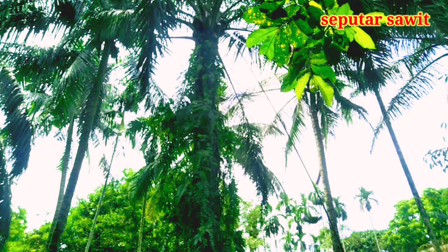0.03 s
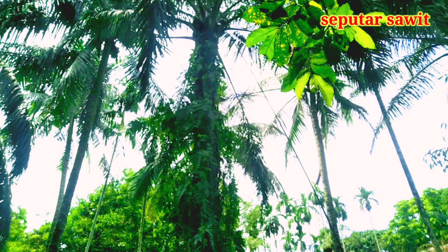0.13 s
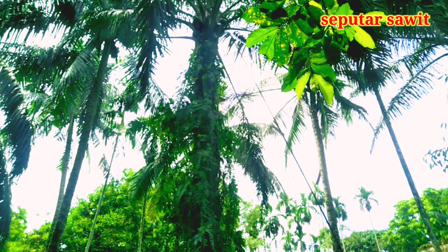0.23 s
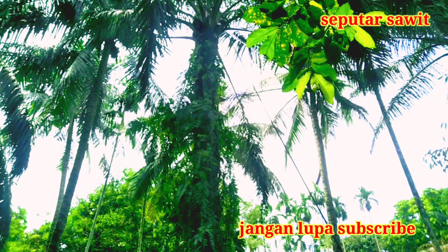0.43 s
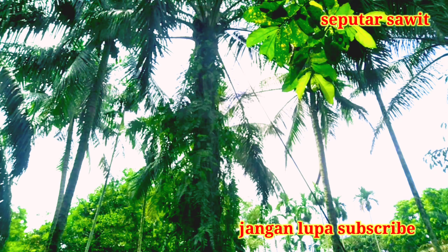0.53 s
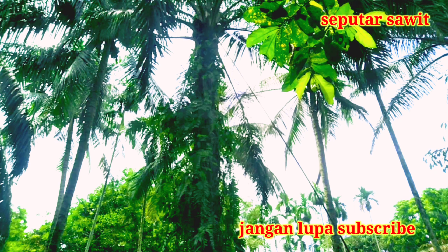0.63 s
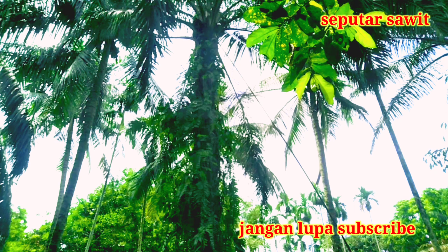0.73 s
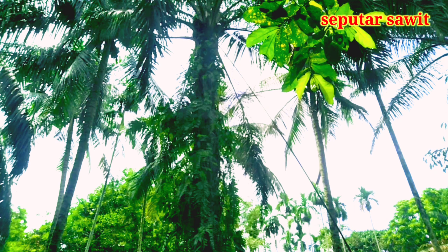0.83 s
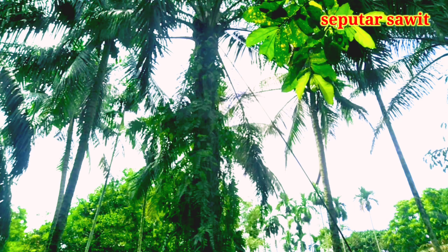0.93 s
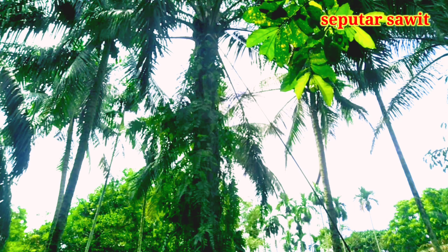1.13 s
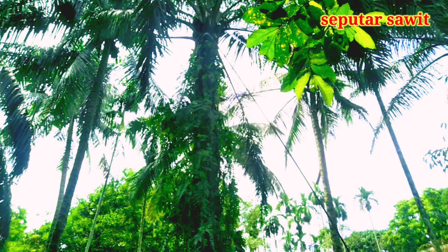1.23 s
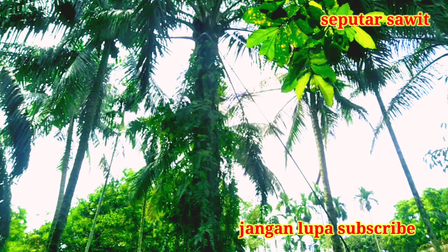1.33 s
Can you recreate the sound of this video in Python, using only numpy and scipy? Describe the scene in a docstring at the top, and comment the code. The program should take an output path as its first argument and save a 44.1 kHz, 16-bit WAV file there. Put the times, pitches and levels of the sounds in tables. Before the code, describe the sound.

A heavy thud on soil and dry leaves, then weaker knocks and crackling twigs.

```python
"""Heavy fall in a plantation

A heavy object, probably a cut palm fruit bunch, lands on soil and dry fronds, rebounds and settles.
Each impact excites damped modes of the soil, the bunch or a woody stalk; leaves and twigs break in
swarms of tiny fractures. The trunks scatter the impacts back as reverberation.
A far slow engine throbs under faint hiss, insect-like chirrs and a few thin whistles."""
import sys
import numpy as np
from scipy import signal
from scipy.fft import rfft, irfft
from scipy.io import wavfile
from scipy.ndimage import uniform_filter1d

SR = 44100
rng = np.random.default_rng(int(sys.argv[2]) if len(sys.argv) > 2 else 0)


def master(y):
    """Save y as 16-bit WAV."""
    cut = np.clip(np.atleast_2d(y).T, -1, 1)
    pcm = np.round(cut * 32767)  # scale
    wavfile.write(sys.argv[1], SR, pcm.astype(np.int16))


N = 61739


def undb(db):
    """Amplitude ratio of a level in decibels."""
    return 10 ** (np.asarray(db) / 20)


def panned(db, pan_db):
    """Level difference: left and right gains, pan_db apart."""
    return undb(db + np.array([[pan_db], [-pan_db]]) / 2)


def unit(x):
    """Normalisation to rms 1."""
    return x / np.sqrt(np.mean(x ** 2) + 1e-20)


def since(start):
    """Elapsed seconds, zero before the start."""
    return np.maximum(np.arange(N) / SR - start, 0)


def decay(t, t60):
    """Exponential damping: 60 dB in t60 seconds."""
    return np.exp(-np.log(1000) * t / t60)


def arch(start, length):
    """Half-sine envelope."""
    return np.sin(np.pi * np.minimum(since(start) / length, 1))


def freqs():
    """Bin frequencies of the spectrum, at least 1 Hz."""
    return np.maximum(np.fft.rfftfreq(N, 1 / SR), 1)


def colour(x, points, tilt_db=0):
    """Spectral shaping by a curve, tilted per octave about 2 kHz and rolled off below its first point."""
    hz, db = np.array(points).T
    octave = np.log2(freqs())
    curve = np.interp(octave, np.log2(hz), db) + tilt_db * (octave - np.log2(2000))
    return irfft(rfft(x) * undb(curve) * np.minimum(freqs() / hz[0], 1) ** 2, N)


def band(x, hz, width):
    """Band-pass filtering, normalised to rms 1."""
    return unit(irfft(rfft(x) / (1 + (2 * (freqs() - hz) / width) ** 2), N))


def diffuse(pair, coherent_below_hz=370):
    """Diffuse field: the two channels are coherent only at long wavelengths."""
    mid, side = rfft(pair)
    apart = 1 / np.hypot(1, coherent_below_hz / freqs()) ** 2
    return irfft((mid + apart * side * np.array([[1], [-1]])) / np.hypot(1, apart), N)


def fractures(per_s, spread_db=2):
    """Brittle fracture as a Poisson process: random clicks, mostly weak and a few strong."""
    clicks = (rng.random((2, N)) < per_s / SR) * rng.choice([-1, 1], (2, N))
    strength = undb(spread_db * np.minimum(rng.exponential(size=(2, N)), 5))
    return diffuse(clicks * strength)


def strike(blows, modes, contact_s, detune, lag_s):
    """Modal superposition: each blow rings slightly detuned modes, lag_s later on the right."""
    out = np.zeros((2, N))
    for start, db, pitch in blows:
        t = np.array([since(start), since(start + lag_s)])
        onset = 1 - np.exp(-t / contact_s)
        for hz, mode_db, t60, pan_db in modes:
            tuned_hz = hz * pitch * (1 + detune * rng.standard_normal())
            out += panned(db + mode_db, pan_db) * np.sin(2 * np.pi * tuned_hz * t) * decay(t, t60) * onset
    return out


# Spectrum of the outdoor hiss (frequency [Hz], relative spectral level [dB])
HISS_SPECTRUM = [(30, 4), (60, -12), (110, 0.5), (140, 0), (175, -0.5), (230, -11.5), (420, -31.5),
                 (900, -25), (1900, -34), (2400, -22.5), (3900, -20.5), (6400, -31), (9300, -28),
                 (12000, -34), (15000, -43)]
def hiss(level_db=-57.5):
    """Ambient noise: a steady diffuse field."""
    return undb(level_db) * unit(colour(diffuse(rng.standard_normal((2, N))), HISS_SPECTRUM))


# Distant chirrs (time [s], duration [s], level [dB], frequency [Hz])
INSECT_CHIRRS = [(0.159, 0.11, -57.5, 4510), (1.103, 0.092, -56, 4560), (1.131, 0.058, -59, 3800),
                 (1.151, 0.11, -62, 4430), (1.385, 0.057, -57.5, 4670)]
def chirrs(width_hz=440):
    """Narrow-band noise, probably from insects, swells and fades."""
    return sum(undb(db) * band(rng.standard_normal((2, N)), hz, width_hz) * arch(start, length)
               for start, length, db, hz in INSECT_CHIRRS)


# Thin tones (time [s], duration [s], level [dB], frequency [Hz], left minus right [dB])
WHISTLE_NOTES = [(.86, 0.084, -66.5, 1443, 16), (.97, 0.08, -66.5, 1447, 13), (0.968, 0.077, -67, 1075, 7),
                 (.995, 0.04, -64.5, 1780, -8), (1.03, 0.1, -69.5, 2500, 0)]
def whistles(waver_depth=0.0029):
    """Random frequency modulation: faint tones, perhaps distant birds, waver in pitch."""
    out = np.zeros((2, N))
    for start, length, db, hz, pan_db in WHISTLE_NOTES:
        waver = unit(uniform_filter1d(rng.standard_normal(N), size=700))
        tone = np.sin(2 * np.pi * np.cumsum(hz * (1 + waver_depth * waver)) / SR)
        out += panned(db, pan_db) * tone * arch(start, length)
    return out


# Strength of the throb (time [s], level [dB])
THROB_LEVELS = [(0, -41), (.2, -43.5), (.48, -43), (.58, -58), (.72, -48.5), (1.0, -49), (1.2, -49),
                (1.35, -42.5)]
# Partials of an exhaust puff (frequency [Hz], relative level [dB])
EXHAUST_PARTIALS = [(134, -2.5), (170, -11), (240, -14)]
def engine(period_s=0.04998, rise_s=0.01411, jitter_s=0.00042, scatter_db=1.5):
    """Quasi-periodic pulse train: each firing arrives as a low puff, rounded by distance."""
    out = np.zeros(N)
    for start in np.arange(0.0045, N / SR, period_s):
        size, late, pitch = rng.standard_normal(3)
        t = since(start + jitter_s * late)
        swell = (t / rise_s * np.exp(1 - t / rise_s)) ** 3
        level_db = np.interp(start, *np.array(THROB_LEVELS).T) + scatter_db * size
        for hz, db in EXHAUST_PARTIALS:
            partial = np.cos(2 * np.pi * hz * (1 + 0.03 * pitch) * (t - rise_s))
            out += undb(level_db + db) * swell * partial
    return out


# Colour of the scattered sound (frequency [Hz], relative gain [dB])
ECHO_SPECTRUM = [(60, -33), (150, -11.5), (240, -7), (400, -11.5), (620, -9), (1000, -6), (1500, -5),
                 (3000, -7), (8000, 1), (15000, -18)]
def grove_echo(x, gain_db=-7, gap_s=0.014, build_s=0.0049, t60_s=0.96):
    """Multiple scattering: after a travel delay, trunks and crowns return a thin reverberation."""
    t = since(gap_s)
    envelope = (1 - np.exp(-t / build_s)) * decay(t, t60_s)
    scatter = colour(diffuse(rng.standard_normal((2, N))), ECHO_SPECTRUM)
    response = scatter * envelope / np.sqrt(np.sum(envelope ** 2))
    return undb(gain_db) * signal.fftconvolve(x, response, axes=1)[:, :N]


# Crinkles of single leaves (time [s], duration [s], level [dB])
LEAF_CRINKLES = [(0.028, 0.037, -58.5), (0.208, 0.013, -53.5), (0.653, 0.12, -64), (0.775, 0.073, -65),
                 (0.959, 0.059, -63.5), (1.136, 0.24, -84), (1.248, 0.066, -60.5)]
# Their spectrum (frequency [Hz], relative spectral level [dB])
CRINKLE_SPECTRUM = [(3000, -15), (5000, -1), (6800, -11), (9000, -1), (12000, -12.5), (15000, -15)]
def leaf_crinkles():
    """Sparse impulse noise: single dry leaves give off fine, bright clicks."""
    clicks = unit(colour(fractures(per_s=1300), CRINKLE_SPECTRUM))
    return clicks * sum(undb(db) * arch(start, length) for start, length, db in LEAF_CRINKLES)


# Crushes of the litter (time [s], level [dB], attack [s], hold [s], T60 [s], tilt [dB/octave])
LITTER_CRUSHES = [(0.004, -57.5, 0.022, 0.11, 0.57, 0.5), (0.137, -55.5, 0.076, 0.035, 0.11, 2.5),
                  (0.228, -37, 0.013, 0.009, 0.11, 1), (0.247, -39.5, 0.016, 0.045, 0.7, 0.5),
                  (0.298, -44.5, 0.017, 0.015, 0.062, -2.5), (0.421, -53, 0.02, 0.047, 0.078, 0),
                  (0.501, -45, 0.0011, 0.0033, 0.054, -1), (0.639, -52.5, .008, 0.064, 0.65, 0.5),
                  (0.778, -50.5, 0.036, 0.017, 0.62, -2), (0.763, -59, 0.0072, 0.087, 0.59, 3.5),
                  (0.95, -61.5, 0.029, 0.12, 0.66, 1.5), (1.103, -61, 0.031, 0.055, 1, 6),
                  (1.259, -59, 0.022, 0.031, 0.42, 2.5)]
# Spectrum of breaking leaves (frequency [Hz], relative spectral level [dB])
LEAF_SPECTRUM = [(150, -7), (250, -5.5), (440, -7), (600, -8), (860, -14), (1110, -9.5), (1460, -13),
                 (2850, -12.5), (5000, -20), (6800, -26), (8800, -23.5), (12600, -34.5), (15000, -37.5)]
# Resonances of the fronds beneath (frequency [Hz], bandwidth [Hz], peak gain [dB])
FROND_RESONANCES = [(510, 82, 2), (867, 33, 9), (1480, 56, 6), (1605, 37, 7), (2154, 22, 6), (2565, 14, 7),
                    (2700, 19, 3), (4420, 28, 8.5)]
def crushed_litter():
    """Source and filter: dense leaf fractures excite the resonances of the fronds."""
    out = np.zeros((2, N))
    fronds = np.prod([1 + (undb(db) - 1) / (1 + 2j * (freqs() - hz) / width)
                      for hz, width, db in FROND_RESONANCES], axis=0)
    for start, db, attack, hold, t60, tilt_db in LITTER_CRUSHES:
        crackle = irfft(rfft(fractures(per_s=7000)) * fronds, N)
        envelope = np.minimum(since(start) / attack, 1) * decay(since(start + attack + hold), t60)
        out += undb(db) * envelope * unit(colour(crackle, LEAF_SPECTRUM, tilt_db))
    return out


# Cracks of twigs and frond ribs (time [s], relative level [dB], frequency [Hz], bandwidth [Hz])
TWIG_CRACKS = [(0.2373, -42, 3460, 3500), (.249, -47.5, 4870, 4000), (0.303, -40.5, 1610, 900),
               (0.316, -41, 1600, 1100), (0.331, -46.5, 2390, 1500), (.5, -49.5, 1650, 1400),
               (0.523, -57.5, 4120, 594), (.612, -60.5, 4060, 1020), (.643, -53.5, 3400, 500),
               (0.6517, -47, 3290, 347), (0.667, -52, 3270, 600), (0.725, -56, 4670, 700),
               (0.7816, -52, 2250, 2230), (0.967, -71, 2500, 900), (1.27, -59.5, 2340, 700),
               (1.295, -70, 2800, 900), (1.325, -61.5, 2870, 700)]
def twig_cracks(attack_s=0.0021, t60_s=0.037):
    """Fracture cascade: each twig breaks in a short run of clicks around its own pitch."""
    out = np.zeros((2, N))
    for start, db, hz, width in TWIG_CRACKS:
        t = since(start)
        envelope = 2 * np.minimum(t / attack_s, 1) * decay(t, t60_s)
        out += undb(db) * envelope * band(fractures(per_s=7000), hz, width)
    return out


# Snaps of dry stems (time [s], level [dB], pitch [ratio])
STEM_SNAPS = [(.0452, -41, 1), (.0473, -38, 1.11), (.0502, -34, 1.02), (.9664, -48.5, 1.45),
              (.9854, -43, 1.42)]
# Modes of a stem (frequency [Hz], relative level [dB], T60 [s], left minus right [dB])
STEM_MODES = [(1248, -16.5, 0.04, 11), (1693, -4.5, 0.025, 4), (2480, -7, 0.017, -2), (2710, -6, 0.014, 2),
              (2970, 1, 0.004, 2), (3980, -8, 0.0052, 7)]
def stem_snaps():
    """Impulse response: an abrupt break rings high, quickly damped modes."""
    return strike(STEM_SNAPS, STEM_MODES, contact_s=0.00011, detune=0.024, lag_s=0.00006)


# Knocks on a thick stalk (time [s], level [dB], pitch [ratio])
STALK_BLOWS = [(.501, -51, 1), (.7826, -34.5, 1.02), (.7845, -33.5, .99), (.798, -38, 1)]
# Modes of the stalk (frequency [Hz], relative level [dB], T60 [s], left minus right [dB])
STALK_MODES = [(237.7, -10, 0.148, -2), (384, -18.5, .05, -5), (632, -7.5, 0.048, -8), (895, -8, 0.036, -9),
               (967, -1, 0.049, 0.5), (1285, -11, 0.044, 18), (1630, -14.5, 0.035, 16),
               (3120, -19, 0.065, -4), (5350, -19.5, 0.018, 22)]
def stalk_knocks():
    """Free vibration: a struck woody stalk rings in inharmonic modes."""
    return strike(STALK_BLOWS, STALK_MODES, contact_s=0.00085, detune=0.0082, lag_s=0.00024)


# Small tumbling bumps (time [s], level [dB], pitch [ratio])
TUMBLE_BLOWS = [(.372, -41.5, 1.02), (.413, -48, 0.87), (.501, -47, 1.01), (.6455, -37.5, .97),
                (.653, -37, 1.04), (.6615, -37.5, 1.016), (.712, -46.5, 0.8), (.763, -49, 0.97),
                (.8105, -43, 0.93), (.863, -47, 0.92), (.915, -48, 0.94), (1.015, -49.5, 0.91),
                (1.264, -52.5, 0.86), (1.275, -55.5, .85), (1.286, -55.5, 0.85)]
# Their modes (frequency [Hz], relative level [dB], T60 [s], left minus right [dB])
TUMBLE_MODES = [(139.4, -9, 0.11, 5.5), (242, -7, 0.057, -1), (414, -6.5, 0.065, -2.5), (525, -6, 0.05, -5),
                (763, -8.5, 0.051, -8), (1055, -10.5, 0.04, 15)]
def tumbling():
    """Impact excitation: light bumps briefly ring low and middle modes."""
    return strike(TUMBLE_BLOWS, TUMBLE_MODES, contact_s=0.00075, detune=0.022, lag_s=0.00019)


# Blows of landing and rolling (time [s], soil level [dB], soil pitch [ratio], knock level [dB])
LANDING_BLOWS = [(0.2335, -24, 1.3, -35.5), (0.2418, -15.5, 0.93, -17.5), (0.2767, -21, 0.91, -36),
                 (0.2862, -28.5, 0.82, -58), (0.324, -37, 0.57, -68), (0.366, -47, 0.65, -62),
                 (.405, -41, 0.79, -56), (0.454, -43, 0.64, -57), (.486, -41, 0.64, -56)]
# Modes of the bunch on the soil (frequency [Hz], relative level [dB], T60 [s])
SOIL_MODES = [(93.7, -21, 0.15), (118.5, -5.5, 0.11), (141.5, -2, 0.11), (188, -14, 0.06)]
# Hollow modes of the bunch (frequency [Hz], relative level [dB], T60 [s], left minus right [dB])
BUNCH_MODES = [(328, -20, 0.072, -5), (518, -12, 0.035, 1), (616, -4.5, 0.039, -10),
               (697, -8.5, 0.035, -4.5), (794, -17, 0.031, 9), (1025, -17, 0.049, 11.5),
               (1523, -21.5, 0.077, 13), (2430, -19.5, 0.019, -22)]
def landing(soil_contact_s=0.0047):
    """Damped mass and spring: the soil yields with a low ring while the bunch knocks hollowly."""
    thud = np.zeros(N)
    for start, db, pitch, _ in LANDING_BLOWS:
        t = since(start)
        onset = 1 - np.exp(-t / soil_contact_s)
        for hz, mode_db, t60 in SOIL_MODES:
            thud -= undb(db + mode_db) * np.sin(2 * np.pi * hz * pitch * t) * decay(t, t60) * onset
    knocks = [(start, db, 1) for start, _, _, db in LANDING_BLOWS]
    return thud + strike(knocks, BUNCH_MODES, contact_s=0.0008, detune=0.013, lag_s=0.0003)


def scene():
    """Superposition: the impacts, their echo and the leaves add to the background."""
    impacts = landing() + tumbling() + stalk_knocks() + stem_snaps() + twig_cracks()
    fall = impacts + grove_echo(impacts) + crushed_litter() + leaf_crinkles()
    return fall + engine() + hiss() + chirrs() + whistles()


def record(dry, low_cut_hz=76.5, top_hz=15200):
    """Band limiting: the phone cuts the deepest bass and the highest treble."""
    thin = irfft(rfft(dry) / np.hypot(1, (low_cut_hz / freqs()) ** 3), N)
    return signal.sosfilt(signal.ellip(8, 0.2, 70, top_hz, fs=SR, output="sos"), thin)


dry = scene()
out = record(dry)
master(out)
```